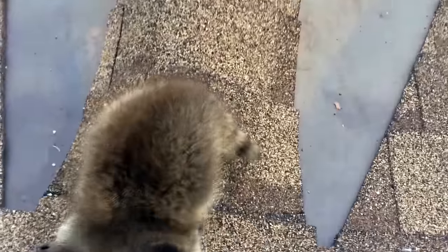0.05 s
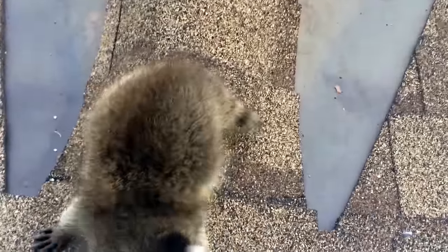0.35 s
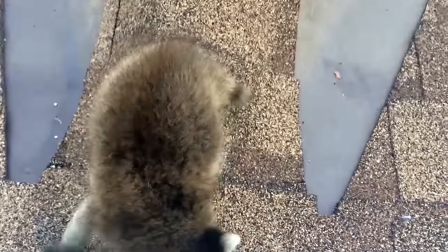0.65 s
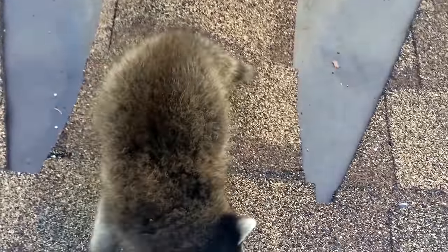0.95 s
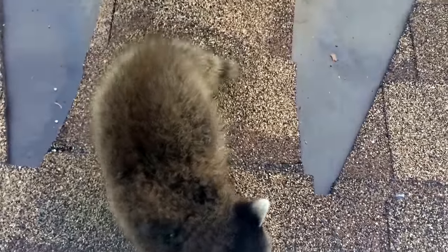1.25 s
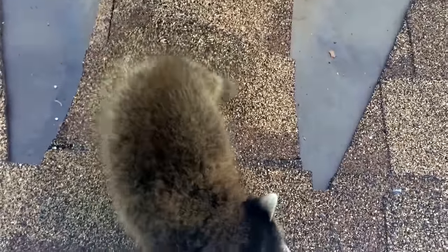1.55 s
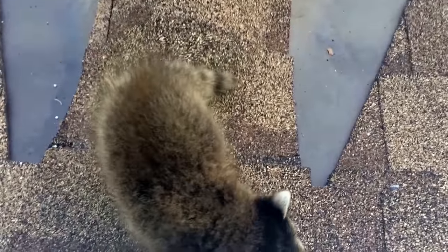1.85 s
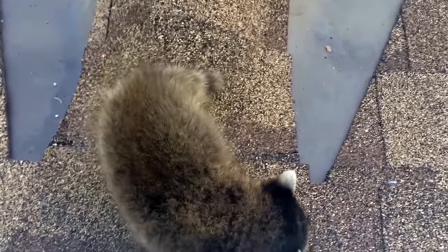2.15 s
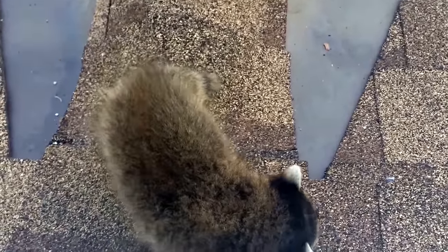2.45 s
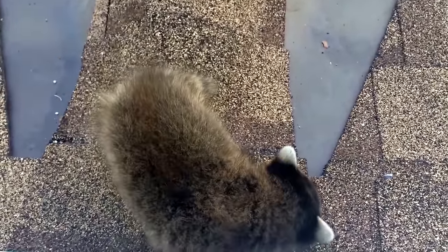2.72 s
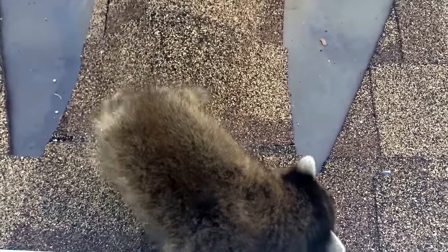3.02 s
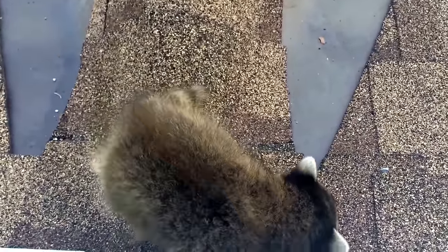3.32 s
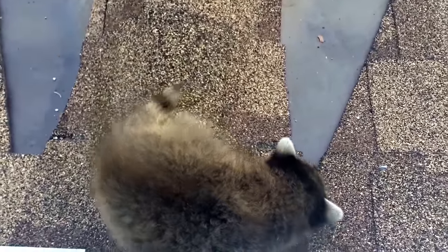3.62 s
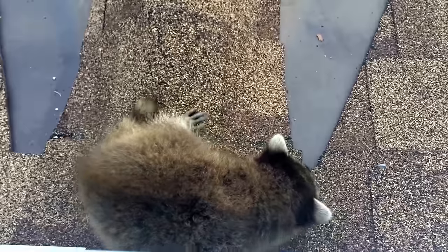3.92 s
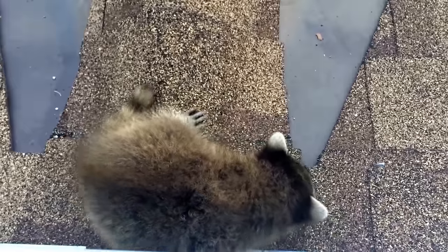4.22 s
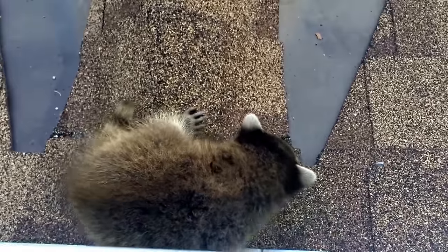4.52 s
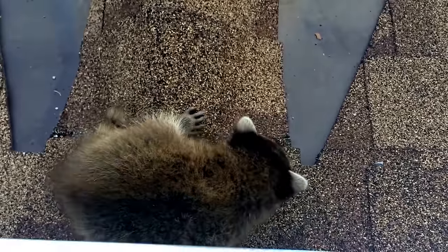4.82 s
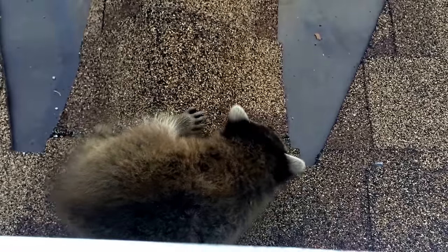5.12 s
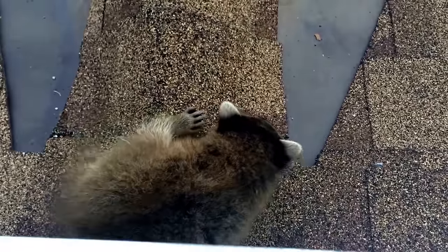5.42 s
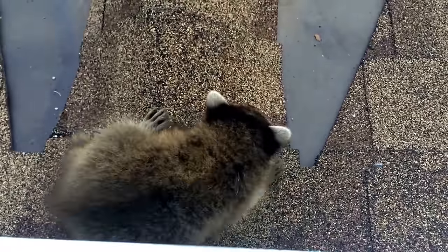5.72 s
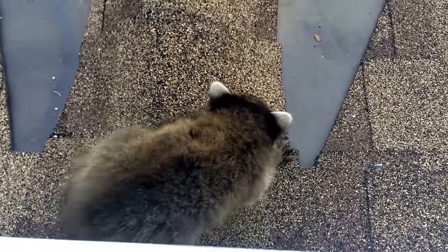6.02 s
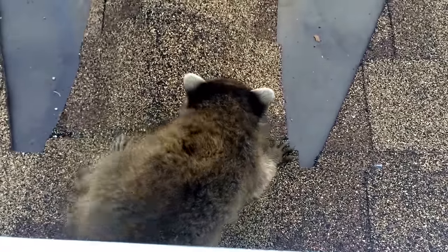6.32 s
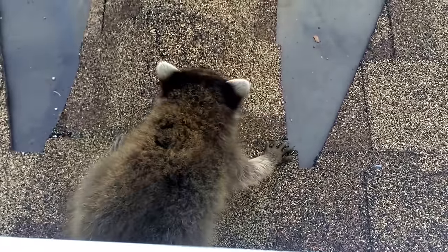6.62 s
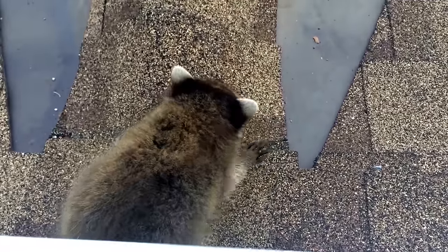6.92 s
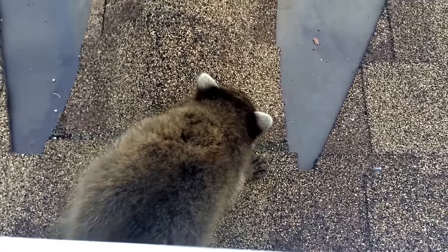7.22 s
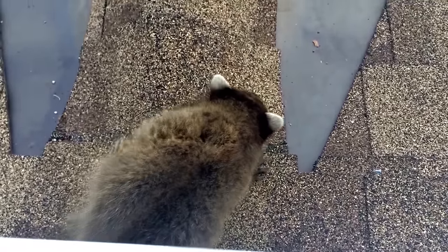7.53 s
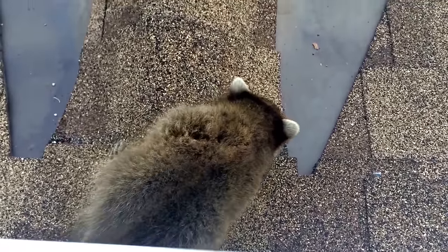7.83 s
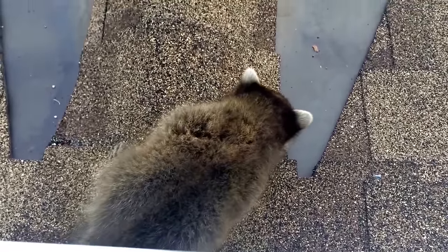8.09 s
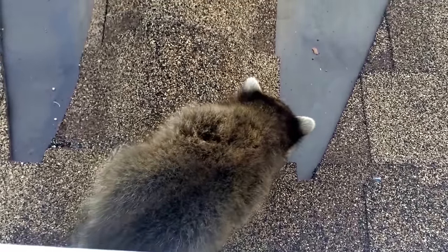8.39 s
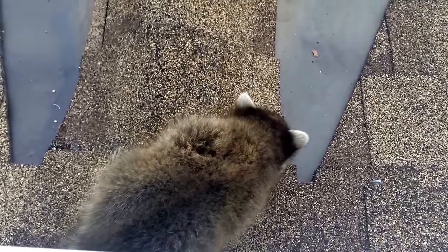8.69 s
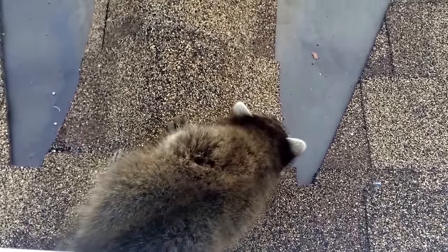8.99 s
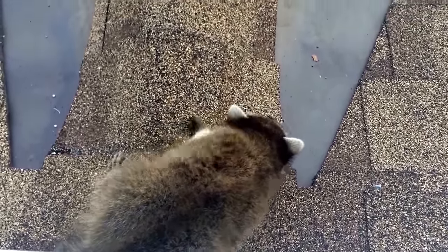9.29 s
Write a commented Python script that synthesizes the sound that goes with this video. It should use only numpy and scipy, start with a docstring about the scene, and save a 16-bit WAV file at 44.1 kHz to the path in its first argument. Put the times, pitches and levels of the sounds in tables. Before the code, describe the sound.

Outdoors on a roof, a young raccoon repeats short, whistling, fluttering trills about once a second, close by. A few soft claw taps follow the first trill, and fainter scratches come later. Tiny mouth clicks lead into the calls, and several trail off in a falling squeak or a puff of hiss. The pauses grow a little longer toward the end, over a faint, steady rumble of far traffic.

```python
"""A young raccoon churrs close by on a shingle roof: nine trills of about 24 warbles a second, each
hurrying toward its end. A warble is a whistle near 1.4 kHz that climbs to a crest and falls off;
between warbles the vocal folds flutter into a rasp. Distant traffic rumbles; walls answer faintly.
Some trills end in a hiss or squeak as the air runs out. Claws tap the shingles, and the mouth
opens with a tick."""
import sys
import numpy as np
from scipy import signal
from scipy.fft import rfft, irfft, next_fast_len
from scipy.io import wavfile
from scipy.ndimage import uniform_filter1d, map_coordinates

SR = 44100
rng = np.random.default_rng(int(sys.argv[2]) if len(sys.argv) > 2 else 0)


def transcribe(signal):
    """Save signal, clipped to [-1, 1], as a 16-bit WAV file at the path in sys.argv[1]."""
    frames = np.atleast_2d(signal).T
    limited = np.clip(frames, -1, 1)
    pcm = np.round(limited * 32767).astype(np.int16)
    wavfile.write(sys.argv[1], SR, pcm)


N = 421155
TIME = np.arange(N) / SR

# held notes that replace the warbles they cover: start/s, end/s, midway dip/share of pitch
HELD_NOTES = [(.374, .414, .04), (1.37, 1.414, .07), (4.863, 4.929, 0), (5.102, 5.149, 0),
              (9.22, 9.281, .05)]
# breath noise spectrum: f/Hz, level/dB
BREATH_SPECTRUM = [(700, -29), (1400, -21.5), (2400, 10.5), (3200, 11), (3700, 2), (4300, -18.5),
                   (4900, -2), (6000, 2), (6700, 1), (7700, 4), (9000, -5.5), (10500, -18.5), (11700, -24),
                   (15000, -27.5)]
# dull contact spectrum, claws and mouth: f/Hz, level/dB
TAP_SPECTRUM = [(100, -15), (500, 1.5), (1100, 6.5), (2000, -1), (3200, -11), (5000, -20), (12000, -45.5)]


def amp(db):
    """Decibels to gain."""
    return 10 ** (np.asarray(db) / 20)


def unit(x):
    """Scale to rms 1."""
    return x / np.sqrt(np.mean(x ** 2) + 1e-20)


def along(points, hz):
    """Interpolate (f/Hz, value) points over log frequency."""
    f, values = np.transpose(points)
    return np.interp(np.log(hz + 1), np.log(np.sort(f) + 1), values)


def filtered(x, response):
    """Zero-phase filter with gain response(hz)."""
    size = next_fast_len(N + SR // 2)
    return irfft(rfft(x, size) * response(np.fft.rfftfreq(size, 1 / SR)), size)[:N]


def noise(spectrum):
    """Coloured noise, rms 1."""
    return unit(filtered(rng.standard_normal(N), lambda hz: amp(along(spectrum, hz))))


def wobble(rate_hz):
    """Smooth random curve, rate_hz knots a second."""
    return map_coordinates(rng.standard_normal(int(N * rate_hz / SR) + 4), [TIME * rate_hz])


def ramp(u):
    """Smooth step, 0 to 1."""
    u = np.clip(u, 0, 1)
    return u * u * (3 - 2 * u)


def phase_of(hz):
    """Running phase/rad of a frequency curve."""
    return 2 * np.pi * np.cumsum(hz) / SR


def burst(start_s, t60_s, attack_s):
    """Slice, age/s and decaying envelope of a short event."""
    t = np.arange(SR // 8) / SR
    first = int(start_s * SR)
    return slice(first, first + len(t)), t, amp(-60 * t / t60_s) * (1 - np.exp(-t / attack_s))


def trill_rhythm(first_s, last_s, rate_hz, hurry, lateness, full_s, opening_s):
    """Start/s, end/s of one trill's notes: they lengthen, hurry, then shorten."""
    u = np.linspace(0, 1, int(round((last_s - first_s) * rate_hz)) + 1)
    ends = first_s + (last_s - first_s) * (u + hurry * u * (1 - u ** lateness))
    opening, closing = [opening_s, opening_s, .88 * full_s], [.84 * full_s, .64 * full_s]
    lengths = np.r_[opening, np.full(len(u) - len(opening) - len(closing), full_s), closing]
    holds = [(a, b) for a, b, _ in HELD_NOTES if first_s < a < last_s]
    free = [(start, end) for start, end in zip(ends - lengths, ends)
            if not any(a < end and start < b for a, b in holds)]
    return np.array(sorted(free + holds))


def warbles(full_s=.026, ceiling_hz=1602, climb_share=.35, even_hz=1450, swell_db_per_hz=.045):
    """All notes: start/s, end/s, pitch/Hz, crest/Hz, level/dB, swell/dB, octave/dB, treble/dB."""
    # trills: first warble end/s, last warble end/s, rate/Hz, hurry/1, lateness exponent/1,
    # full warble/s, opening warble/s, first pitch/Hz, crest swell/dB
    trills = [(0.016, .414, 25, .1, 5.65, 0.027, 0.026, 1390, -3),
              (1.043, 1.416, 24, 0.13, 1.92, .022, .011, 1270, -2),
              (1.863, 2.102, 25, 0.063, 1.6, 0.02, .014, 1385, 0),
              (2.746, 3.137, 23, 0.082, 5.95, .025, .015, 1340, -3),
              (3.659, 4, 23, .062, 7.3, .026, .017, 1326, 0),
              (4.727, 5.149, 26, .082, 4, .029, .019, 1346, 0.5),
              (5.732, 6.128, 25, .186, 1, .027, .017, 1323, -5.5),
              (7.16, 7.618, 24, 0.12, 2.04, 0.026, .024, 1302, 0.5),
              (8.925, 9.319, 23, 0.41, 0.45, 0.027, .011, 1190, -1)]
    # voice course per trill: t/s, pitch/Hz, level/dB, octave/dB re level, treble/dB re level
    courses = [
        [(.057, 1368, -43, 9.5, -1), (.146, 1409, -44.5, 11, -2), (.19, 1450, -46, 19, 7),
         (.234, 1443, -37, 3.5, -7.5), (.319, 1518, -29.5, -5.5, -14.5), (.357, 1510, -26, -41, -11),
         (.414, 1510, -22.5, -16.5, -20.5)],
        [(1.09, 1279, -24, -6.5, -18), (1.225, 1326, -23, -7, -18.5), (1.347, 1396, -22, -9.5, -20.5),
         (1.416, 1368, -22, -12.5, -15)],
        [(1.903, 1489, -15, -12, -27.5), (1.949, 1451, -15.5, -10.5, -23), (2.066, 1427, -20.5, -9.5, -20),
         (2.102, 1362, -25, -4.5, -11)],
        [(2.793, 1391, -20, -6, -22.5), (2.839, 1335, -25, -4, -17.5), (2.935, 1353, -23, -4.5, -14.5),
         (3.025, 1503, -19, -9.5, -20.5), (3.137, 1478, -19, -7, -20.5)],
        [(3.703, 1400, -22.5, -2.5, -16), (3.77, 1457, -18.5, -6, -23), (3.838, 1445, -23.5, -1.5, -13.5),
         (3.933, 1488, -21.5, 0, -19.5), (4.002, 1452, -21.5, -1.5, -23.5)],
        [(4.771, 1469, -22, -8.5, -21.5), (4.854, 1455, -20, -6.5, -20.5), (4.929, 1502, -22, -8, -22),
         (4.974, 1451, -23, -6.5, -22), (5.086, 1426, -25.5, -6, -17.5), (5.149, 1488, -21.5, -10.5, -24)],
        [(5.779, 1398, -24, -11, -23.5), (5.947, 1449, -21.5, -8, -21.5), (6.062, 1445, -21.5, -11.5, -22.5),
         (6.098, 1318, -33, -8.5, -10.5), (6.127, 1379, -27, -4.5, -14)],
        [(7.205, 1363, -24, -10, -21.5), (7.299, 1338, -26, -3, -16), (7.383, 1451, -19, -11, -21),
         (7.48, 1497, -18, -13, -21.5), (7.581, 1470, -21.5, -13, -19.5), (7.618, 1393, -26, -9.5, -16)],
        [(8.978, 1316, -23, -9.5, -22.5), (9.031, 1291, -29.5, -2.5, -15.5), (9.124, 1380, -21, -11.5, -18),
         (9.162, 1469, -18, -15, -23.5), (9.281, 1486, -18, -13.5, -23), (9.318, 1451, -22, -11, -18.5)],
    ]
    # weak, low notes after a trill: start/s, end/s, pitch/Hz, level/dB
    afternotes = [(4.016, 4.031, 1260, -32.5), (4.043, 4.051, 1254, -35.5), (5.163, 5.179, 1265, -38.5),
                  (5.188, 5.203, 1213, -42.5)]
    # their timbre: swell/dB, octave/dB, treble/dB, all re level
    afternote_timbre = (-6, -3, -19)
    notes = [(start, end, hz, hz, db, *afternote_timbre) for start, end, hz, db in afternotes]
    for (*rhythm, first_hz, push_db), course in zip(trills, courses):
        start, end = trill_rhythm(*rhythm).T
        knots_s, *controls = np.transpose(course)
        hz, db, octave_db, treble_db = (np.interp(end, knots_s, control) for control in controls)
        first = start == start[0]
        hz = np.where(first, first_hz, hz)
        db, treble_db = db - 6 * first, treble_db - 3 * first  # soft, dull start
        fullness = np.minimum((end - start) / full_s, 1)  # short warbles climb and swell less
        crest_hz = hz + fullness * climb_share * (ceiling_hz - hz)
        # low warbles swell at the crest, high ones ease off
        swell_db = push_db + np.minimum(swell_db_per_hz * (even_hz - hz), 4) - 8 * (1 - fullness)
        notes += zip(start, end, hz, crest_hz, db, swell_db, octave_db, treble_db)
    return np.array(sorted(notes))


def per_warble(values):
    """Hold one value through each warble; interpolate across gaps."""
    return np.interp(TIME, np.sort(warbles()[:, :2].ravel()), np.repeat(values, 2))


def gestures(crest_lead_s=.0046, crest_width_s=.0034, climb_lead_s=.014, climb_s=.008,
             scoop_s=.004, scoop_per_s=17, fall_lead_s=.004, fall_per_s=36,
             attack_s=.0029, release_lag_s=.0076, release_s=.012, rasp_build_s=.03, rasp_decay_s=.012,
             slur_gap_s=.0115, slur_dip=.14, quaver_s=.006):
    """Vocal fold controls: pitch/Hz, voicing, crest, rasp. Close warbles slur together."""
    pitch, voiced, crest, rasp = np.full(N, 950.), np.zeros(N), np.zeros(N), np.zeros(N)
    last_end = trill_start = -1
    for start, end, hz, crest_hz, *_ in warbles():
        near = slice(max(0, int((start - .03) * SR)), int((end + .1) * SR))
        t = TIME[near]
        trill_start = start if start - last_end > .2 else trill_start
        onset = last_end if start - last_end < slur_gap_s else start
        last_end = end
        climb_hz = hz + (crest_hz - hz) * ramp((t - end + climb_lead_s) / climb_s)
        # pitch scoops in and drops out; in a slur it only dips
        scoop = scoop_per_s * np.maximum(start + scoop_s - t, 0)
        fall = fall_per_s * np.maximum(t - end + fall_lead_s, 0)
        slurred = (onset < start) & (t > onset - fall_lead_s) & (t < start + scoop_s)
        floor_hz = slurred * hz * (1 - slur_dip)
        pitch[near] = np.maximum.reduce([pitch[near], climb_hz * np.exp(-scoop - fall), floor_hz])
        voiced[near] += ramp((t - onset) / attack_s + .4) * ramp((end + release_lag_s - t) / release_s)
        crest[near] += np.exp(-((t - end + crest_lead_s) / crest_width_s) ** 2 / 2)
        pressure = .35 + .65 * ramp((start - trill_start) / rasp_build_s)
        rasp_fade = np.exp(-np.maximum(t - end - .016, 0) / rasp_decay_s)
        rasp[near] = np.maximum(rasp[near], pressure * ramp((t - start) / .004) * rasp_fade)
    for start, end, dip in HELD_NOTES:
        pitch *= 1 - dip * np.exp(-((TIME - (start + end) / 2) / quaver_s) ** 2 / 2)
    return uniform_filter1d(pitch, size=70), np.minimum(voiced, 1), crest, rasp


def fold_flutter(squeal_hz=1750):
    """Chaotic folds between warbles: rough noise with a wandering squeal."""
    # rasp spectrum: f/Hz, level/dB
    rasp_spectrum = [(300, -49), (700, -20.5), (1000, -19.5), (1400, -2), (1750, -3), (2000, -14.5),
                     (2350, 3), (2650, -15), (3000, -9.5), (3600, -24), (5000, -18.5), (8500, -24.5),
                     (11500, -45.5), (15000, -54.5)]
    squeal = np.sin(phase_of(squeal_hz * np.exp(.14 * wobble(150) + .07 * wobble(900))))
    return noise(rasp_spectrum) + squeal


def churr(overtone_db=-2, hiss_db=-7.5, rough_hiss_db=3, rasp_db=-16, half_order_db=-27, scatter_db=3):
    """Whistle through the throat resonances: brightest at each crest, rough where it breaks."""
    # throat and mouth response: f/Hz, gain/dB
    throat = [(900, -28), (1130, -3), (1270, -1), (1450, 7), (1600, 12), (1900, -2.5), (2350, 2.5),
              (2600, -8), (2950, -6.5), (3400, -18), (4300, -8.5), (4900, -11.5), (5500, -24), (6050, -18)]
    # envelope of harmonics 4-10: f/Hz, gain/dB
    overtone_shape = [(4800, -1), (5500, -5.5), (6050, 1), (6600, -8.5), (7500, -9.5), (8200, -23),
                      (8950, -14), (9700, -18.5), (10400, -21.5), (11500, -36.5), (15000, -35)]
    _, _, note_hz, _, note_db, swell_db, note_octave_db, treble_db = warbles().T
    pitch, voiced, crest, rasp = gestures()
    swell_scatter, treble_scatter = scatter_db * rng.standard_normal((len(note_db), 2)).T
    base_hz, level_db = per_warble(note_hz), per_warble(note_db)
    octave_db, bright_db = per_warble(note_octave_db), per_warble(treble_db + treble_scatter)
    slack = ramp((1 - pitch / base_hz) / .2)
    # folds settle only in unbroken stretches; near a break they vibrate unevenly
    rough = ramp(3.5 * (1 - uniform_filter1d(voiced, size=SR // 25)))
    jitter = .0015 + rough * (.005 + .005 * crest + .034 * slack)
    pitch = pitch * (1 + .004 * wobble(60) + .005 * wobble(220) + jitter * wobble(1400))
    phase = phase_of(pitch)

    sine = lambda k: np.sqrt(2) * np.sin(k * phase)
    shimmer = lambda: amp((.7 + 2.8 * rough) * wobble(800))
    partial = lambda k: sine(k) * amp(along(throat, k * pitch) - along(throat, k * base_hz))
    overtone = lambda k: sine(k) * amp(overtone_db + along(overtone_shape, k * pitch)) * shimmer()
    tone = partial(1) * amp(per_warble(swell_db + swell_scatter) * crest)
    tone += partial(2) * amp(octave_db + 1.5 * wobble(190))
    tone += partial(3) * amp(.3 * octave_db + .7 * bright_db - 2.5) * shimmer()
    tone += partial(3 / 2) * amp(half_order_db) * rough * wobble(120)  # alternate cycles differ
    edge = amp(bright_db + 6.5 * crest - 4 * slack + wobble(120))
    tone += edge * sum(overtone(k) for k in range(4, 11))

    leak = 1 + .38 * np.cos(phase)  # air escapes once a cycle
    hiss = edge * amp(hiss_db + rough_hiss_db * rough + 2 * crest) * noise(BREATH_SPECTRUM) * leak
    flutter = fold_flutter() * amp(rasp_db) * np.hypot(1, amp(octave_db))
    broken = rasp * (1 - .9 * voiced) * amp(1.8 * wobble(250))
    return amp(level_db) * (voiced * (tone + hiss) + broken * flutter)


def mouth_beam(x, notch_hz=4950, lift_hz=8400):
    """The mouth beams its treble, so head direction colours each trill."""
    # colour per trill: t/s, 5-10 kHz tilt/(dB/octave), notch depth/dB, nasal lift/dB
    head_poses = [(.2, 0.5, 2.5, 2.5), (1.2, -6, 12, -3.5), (2, -8, 3.5, 2), (2.95, -0.5, 2.5, -5),
                  (3.85, 2.5, 0.5, 1.5), (4.95, 9.5, -0.5, 2.5), (5.9, -3, 8.5, 10.5), (7.4, -5.5, -4, 12),
                  (9.1, 6.5, 0, -9)]
    out = np.zeros(N)
    centres_s = np.transpose(head_poses)[0]
    nearest = np.searchsorted((centres_s[1:] + centres_s[:-1]) / 2, TIME)
    bell = lambda hz, centre_hz, log_width: np.exp(-(np.log((hz + 1) / centre_hz) / log_width) ** 2)
    for index, (_, tilt_db, notch_db, lift_db) in enumerate(head_poses):
        tilt = lambda hz: tilt_db * np.log2(np.clip(hz / 5000, 1, 2))
        notch = lambda hz: notch_db * bell(hz, notch_hz, log_width=.33)
        lift = lambda hz: lift_db * bell(hz, lift_hz, log_width=.22)
        out += filtered(x * (nearest == index), lambda hz: amp(tilt(hz) - notch(hz) + lift(hz)))
    return out


def outdoors(rumble_db=-52, air_db=-62, hum_db=-70, hum_hz=360):
    """Distant traffic, open air and a faint machine hum."""
    # traffic spectrum: f/Hz, level/dB
    traffic_spectrum = [(12, -41.5), (20, -31.5), (53, -4), (92, -2), (129, 0.5), (263, -10.5), (325, -14),
                        (359, -13), (392, -16.5), (492, -20), (600, -32), (780, -44.5), (1320, -120)]
    # open-air spectrum: f/Hz, level/dB
    air_spectrum = [(290, -30.5), (500, -4.5), (876, 0.5), (941, -1), (1030, -0.5), (1200, -3),
                    (1390, -3.5), (1930, -10.5), (2570, -18), (9240, -28.5), (14600, -28), (15500, -35.5)]
    rumble = amp(rumble_db + .64 * wobble(1.7)) * noise(traffic_spectrum)
    air = amp(air_db + .2 * wobble(2.3)) * noise(air_spectrum)
    hum = amp(hum_db + 2 * wobble(8.6)) * np.sin(phase_of(hum_hz + 2.5 * wobble(6.2)))
    return rumble + air + hum


def wall_echo(x, delay_samples=300):
    """Diffuse reflections off nearby walls; treble dies first."""
    # echo decay: f/Hz, t60/s
    decay = [(300, .5), (1500, .65), (3000, .5), (5000, .15), (12000, 0.087)]
    hz, t, spectra = signal.stft(rng.standard_normal((SR * 3) // 4), SR, nperseg=256)
    tail = signal.istft(spectra * amp(-60 * t / along(decay, hz)[:, None]), SR, nperseg=256)[1]
    return signal.fftconvolve(x, np.pad(tail / np.linalg.norm(tail), (delay_samples, 0)))[:N]


def exhales():
    """Escaping air: a hiss ends some trills, a dull puff comes early in some."""
    # closing hisses: t/s, level/dB, t60/s
    sighs = [(.425, -80.5, 0.1), (3.175, -48.5, 0.15), (4.055, -46, 0.18), (5.204, -43, .14),
             (6.15, -43.5, .06)]
    # puffs: t/s, level/dB
    puffs = [(1.077, -41), (5.764, -42), (8.966, -41)]
    # puff spectrum: f/Hz, level/dB
    puff_spectrum = [(100, -22), (320, 3), (550, -7), (1000, -23.5), (2000, -35)]
    out, dull, hiss = np.zeros(N), noise(puff_spectrum), noise(BREATH_SPECTRUM)
    for start_s, db, t60_s in sighs:
        near, _, fade = burst(start_s, t60_s, attack_s=.0019)
        out[near] += amp(db) * fade * hiss[near]
    for start_s, db in puffs:
        near, _, fade = burst(start_s, t60_s=.081, attack_s=.0012)
        out[near] += amp(db) * fade * dull[near]
    return out


def squeaks():
    """Thin, unsteady whistles slide down as a trill runs out of air."""
    # squeaks: start/s, end/s, first f/Hz, last f/Hz, level/dB
    glides = [(0.427, 0.44, 1950, 1740, -32), (3.156, 3.213, 1830, 1670, -34),
              (4.057, 4.1, 2300, 1905, -42), (5.202, 5.235, 1960, 1543, -39.5),
              (7.629, 7.65, 1846, 1545, -40), (9.331, 9.384, 1824, 1545, -39.5)]
    out = np.zeros(N)
    waver = 1 + .045 * wobble(800)
    for start_s, end_s, first_hz, last_hz, db in glides:
        near = slice(int(start_s * SR), int(end_s * SR))
        u = np.linspace(0, 1, len(out[near]))
        hz = (first_hz + (last_hz - first_hz) * u) * waver[near]
        out[near] += amp(db) * ramp(u * 6) * ramp((1 - u) * 1.58) * np.sin(phase_of(hz))
    return out


def claws():
    """Claws and pads on shingles: dull taps with a scratch of grit."""
    # contacts: t/s, level/dB, t60/s, grit/dB re level
    contacts = [(0.756, -35, 0.017, -17.5), (0.781, -44.5, 0.022, -23), (0.819, -58.5, 0.16, 7),
                (0.853, -35.5, 0.021, -16.5), (.878, -42.5, 0.017, -25), (1.585, -41, 0.043, -13),
                (5.581, -63.5, 0.027, 9.5), (5.637, -59.5, 0.091, 1), (5.661, -56, 0.066, -3.5),
                (7.903, -54.5, 0.022, -7), (9.394, -56, 0.021, 3.5)]
    # grit spectrum: f/Hz, level/dB
    grit_spectrum = [(1000, -18), (3000, 2), (4300, -1), (5600, -2), (7000, -4.5), (10000, -11.5),
                     (15000, -14.5)]
    out, tap = np.zeros(N), noise(TAP_SPECTRUM)
    grit = unit(noise(grit_spectrum) * amp(5.6 * wobble(500)))
    for start_s, db, t60_s, grit_db in contacts:
        near, _, fade = burst(start_s, t60_s, attack_s=.0007)
        out[near] += amp(db) * fade * (tap[near] + amp(grit_db) * grit[near])
    return out


def mouth_ticks(gain_db=2):
    """The mouth opens before a trill: a short ring with a wet edge."""
    # openings: t/s, level/dB before gain, ring f/Hz, relative treble/dB
    openings = [(0.993, -33.5, 944, -39), (1.82, -32, 1357, -15), (2.699, -41.5, 1032, -9),
                (3.61, -33, 1047, -3), (4.679, -32, 1053, -2.5), (5.68, -29.5, 1037, -12),
                (7.11, -28, 1067, -25.5), (8.873, -40.5, 1034, -19.5)]
    out, wet, hiss = np.zeros(N), noise(TAP_SPECTRUM), noise(BREATH_SPECTRUM)
    for start_s, db, hz, treble_db in openings:
        near, t, fade = burst(start_s, t60_s=.03, attack_s=.0012)
        ring = np.sin(2 * np.pi * hz * t)
        out[near] += amp(db + gain_db) * fade * (ring + .5 * wet[near] + amp(treble_db - 10.5) * hiss[near])
    return out


def scene(echo_db=-30):
    """Raccoon, wall echo and background, mono."""
    raccoon = mouth_beam(churr()) + squeaks() + exhales() + mouth_ticks() + claws()
    return (raccoon + amp(echo_db) * wall_echo(raccoon) + outdoors())[None]


def record(dry, cutoff_hz=15500):
    """Brick-wall low-pass."""
    return filtered(dry[0], lambda hz: hz < cutoff_hz)[None]


dry = scene()
out = record(dry)
transcribe(out)
```